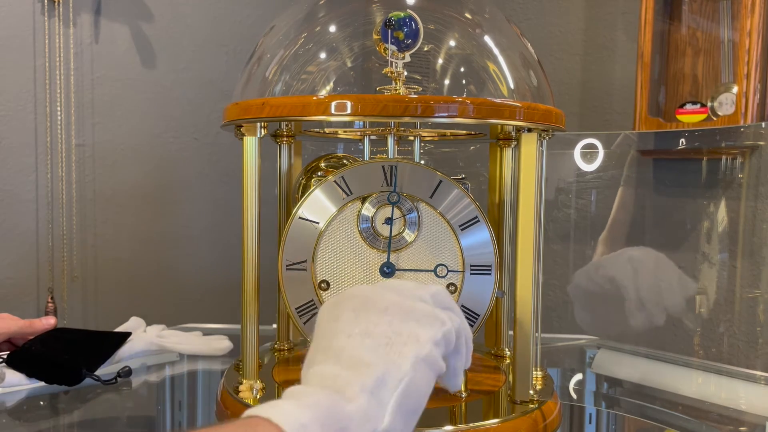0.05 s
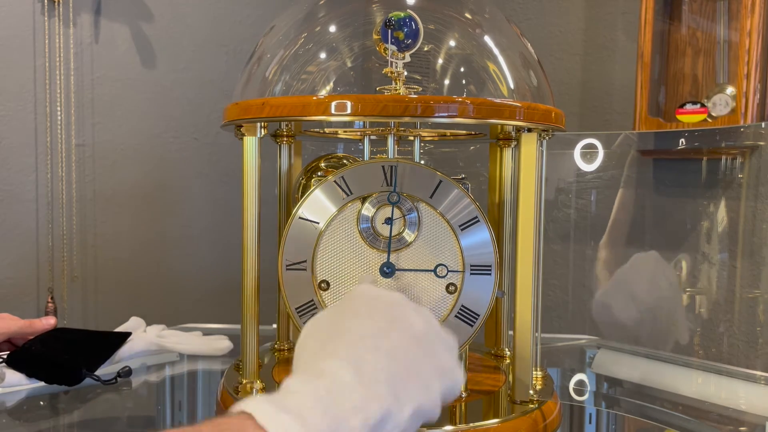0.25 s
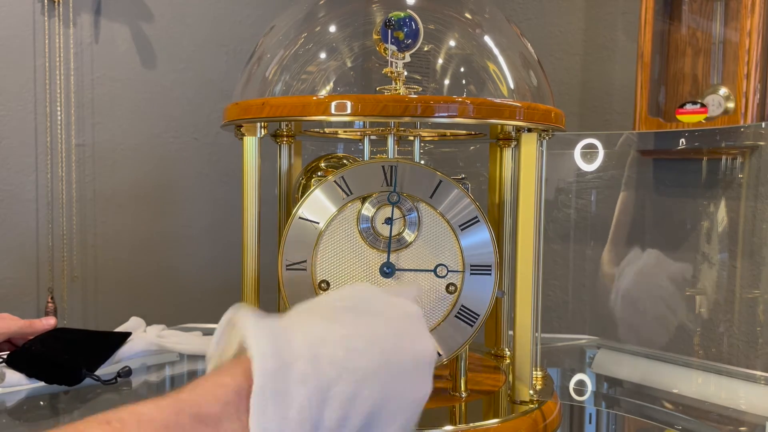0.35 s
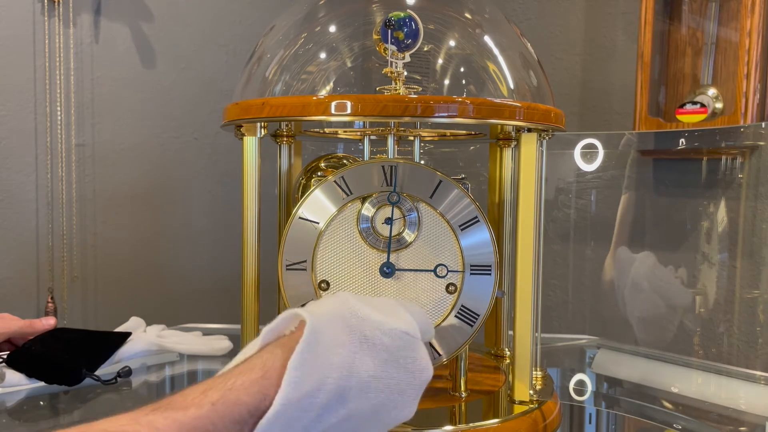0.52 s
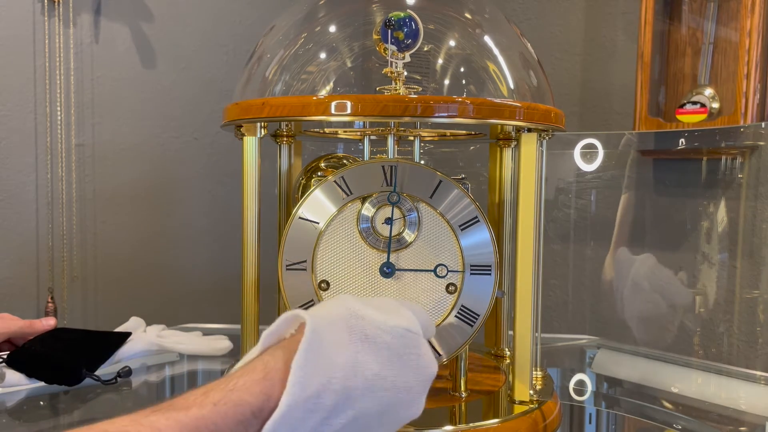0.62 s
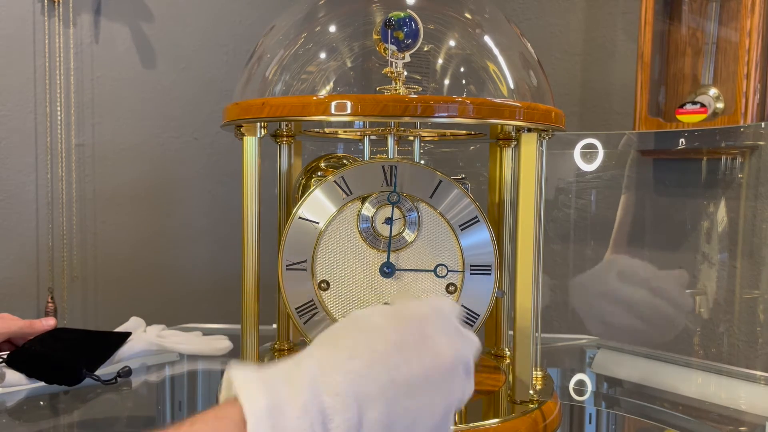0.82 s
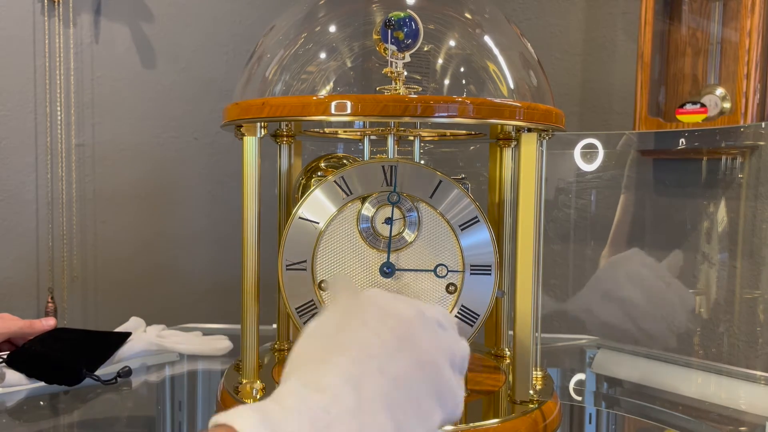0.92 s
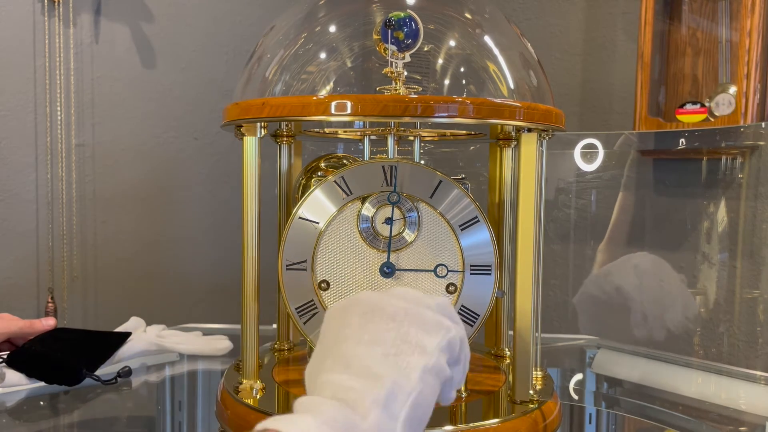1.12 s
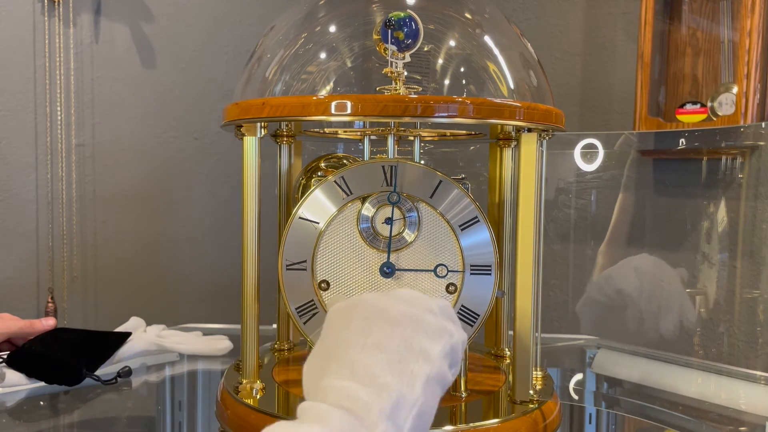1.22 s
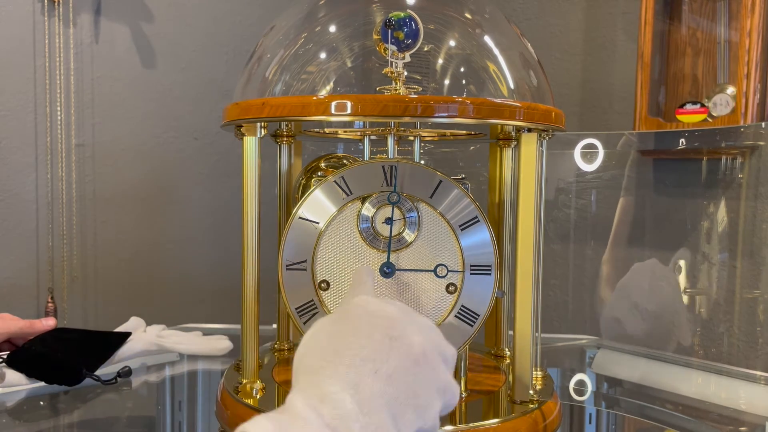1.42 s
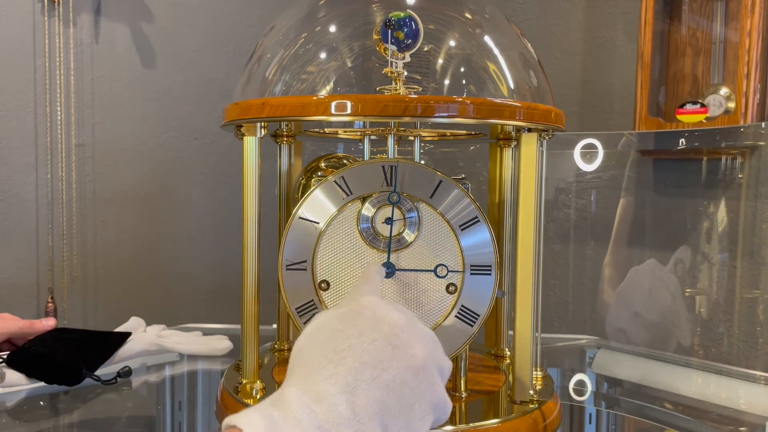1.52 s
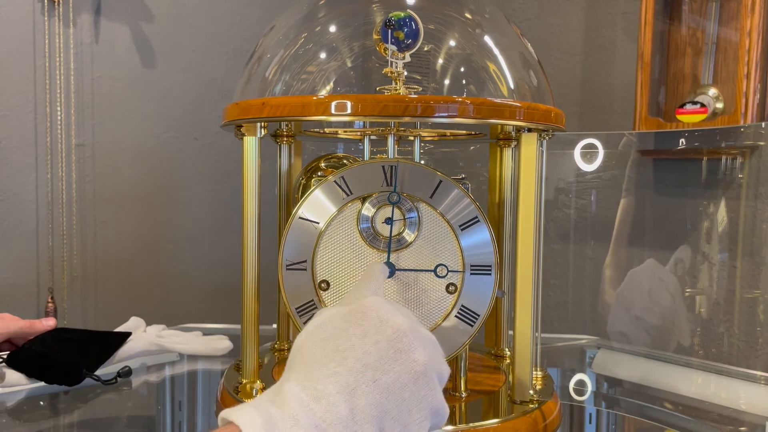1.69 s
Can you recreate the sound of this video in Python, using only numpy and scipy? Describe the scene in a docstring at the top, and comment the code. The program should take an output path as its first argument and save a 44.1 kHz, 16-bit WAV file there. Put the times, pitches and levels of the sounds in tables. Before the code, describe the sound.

Close up, a clock's winding ratchet snaps seven times in quick succession, once more just after, and twice after a pause. The clock ticks faintly and quickly throughout, with soft bumps from a gloved hand and a low room rumble.

```python
"""A quick run of seven ratchet snaps, then three single clicks: a gloved hand winds a brass table clock.
The pawl slips off each tooth and snaps into the next, ringing small parts, plates and case.
Behind it the escapement ticks five times a second and the glove bumps softly on key and case.
Two close microphones also hear reflections off the glass dome, a small room's tail and a low rumble."""
import sys
import numpy as np
from scipy import signal
from scipy.fft import rfft, irfft
from scipy.io import wavfile

SR = 44100
rng = np.random.default_rng(int(sys.argv[2]) if len(sys.argv) > 2 else 0)


def int16_out(signal):
    """Quantize to a 16-bit WAV file."""
    q = np.round(np.clip(np.atleast_2d(signal).T, -1, 1) * 32767)
    wavfile.write(sys.argv[1], SR, q.astype(np.int16))


N = 77175

# pawl snaps: t/s, level/dB, treble/dB, body ring/dB, slip lead/s, slip level/dB, single-tooth weight/0..1
PAWL_SNAPS = [(0.2101, -1.5, 1, 0, 0.0029, -21.5, 0.012), (0.252, 3, -3, -5.5, 0.0024, -23, 0.39),
              (.2840, 0.5, -0.5, -11, .0012, -3.5, 0), (.3213, -2.5, 2.5, -2.5, 0.0012, -6.5, 0),
              (.3578, 2, -2, -2.5, .0010, -10, 0.12), (.3953, -3, 3, 1.5, 0.00049, -5, 0.27),
              (.4322, -3, -0.5, -0.5, 0.002, 1, 0.43), (.5230, -3.5, 1, 2, .0045, -5, 0.8),
              (1.3463, -2.5, 1, 2.5, .0020, -6.5, 1), (1.4886, -3, 1, 2.5, .0046, -2.5, 1)]
# plate and case modes: f/Hz, level/dB, t60/s, change when the key eases over a single tooth/dB
BODY_MODES = [(171, -20.5, 0.18, -9.5), (530, -10, 0.072, -4.5), (619.8, -13.5, 0.18, 1),
              (717.6, -16.5, 0.12, 0), (953.6, -9.5, 0.087, -3.5), (1187, -19.5, 0.029, 0),
              (1257, -8, 0.049, 8.5), (1575, 0.5, 0.057, -15), (2030, -19.5, .05, 13.5),
              (2222, 1, .032, 7.5), (2370, -5.5, 0.033, 2.5), (2940, -5.5, 0.07, 0.5),
              (3258, -14, 0.053, 11.5), (4970, -5.5, 0.048, 1), (12900, -6.5, .07, -9),
              (15490, -8.5, .1, 2)]
# dense ring of small steel and brass parts: f/Hz, level/dB
PARTS_SPECTRUM = [(200, -18), (380, -22), (560, -12), (800, -20), (1000, -12.5), (1250, -3.5), (1750, -14),
                  (2200, 4.5), (2650, -4), (3300, -2.5), (4300, -3), (6000, 0.5), (7000, -1.5),
                  (10500, 5.5), (12500, 5), (14000, 7.5), (15600, 13), (16500, -25)]
# decay of that ring: f/Hz, t60/s
PARTS_DECAY = [(500, 0.19), (2000, 0.049), (5000, 0.038), (10000, 0.037), (16000, 0.016)]


def ratchet(size=8192):
    """Pawl slip and snap both ring the small parts; the snap also rings plates and case."""
    out = np.zeros(N)
    parts_db, modes_db = -15.5, -33
    common_ring, common_power = noise(PARTS_SPECTRUM, size), 0.11
    hz, mode_db, t60_s, single_db = np.array(BODY_MODES).T[:, :, None]
    for at_s, level_db, treble_db, body_db, lead_s, slip_db, single in PAWL_SNAPS:
        for start_s, contact_db in ((at_s - lead_s, slip_db), (at_s, 0)):
            fresh_ring = noise(PARTS_SPECTRUM, size)
            ring = np.sqrt(common_power) * common_ring + np.sqrt(1 - common_power) * fresh_ring
            ring = band_decay(brighten(ring, treble_db), PARTS_DECAY, rise_s=0.0006)
            add(out, start_s, ring * undb(parts_db + level_db + contact_db))
        body = struck_modes(hz, mode_db + single * single_db, t60_s, rise_s=0.0017)
        add(out, at_s, body * undb(modes_db + level_db + body_db))
    return out


# escapement beats: t/s, level/dB, treble/dB
BEATS = [(.116, 0, 2), (.316, 6, -3), (.517, 12, -6), (0.7174, 0, 2.5), (.918, 1, 1.5), (1.114, -3, 3.5),
         (1.316, 3.5, 2), (1.507, -19, 2), (1.701, 10, -3.5)]
# unlock, impulse, drop: t/s from the beat, level/dB
BEAT_CONTACTS = [(-.004, -14.5), (0, -7.5), (.003, -2)]
# contact noise: f/Hz, level/dB
CONTACT_SPECTRUM = [(300, -11.5), (1000, -7), (1600, -5), (2100, 8), (2550, -1), (3000, 1.5), (4200, -13),
                    (5500, 0.5), (7500, 3.5), (10500, 2.5), (13000, 4.5), (15500, 5.5), (16500, 0)]
# pallet and wheel modes: f/Hz, level/dB, t60/s
PALLET_MODES = [(2045, -14, 0.093), (2980, -8.5, 0.034), (3560, -13, .03), (4910, -18, 0.014)]


def escapement(size=4096):
    """Each beat is three small contacts between pallet and wheel, which ring briefly."""
    out = np.zeros(N)
    clicks_db, modes_db, rise_s = -45.5, -52, 0.0005
    shape = envelope(np.arange(size) / SR, rise_s, t60_s=0.032)
    hz, mode_db, t60_s = np.array(PALLET_MODES).T[:, :, None]
    for at_s, level_db, treble_db in BEATS:
        for offset_s, contact_db in BEAT_CONTACTS:
            click = brighten(noise(CONTACT_SPECTRUM, size), treble_db) * shape
            add(out, at_s + offset_s, click * undb(clicks_db + level_db + contact_db))
        add(out, at_s, struck_modes(hz, mode_db, t60_s, rise_s) * undb(modes_db + level_db))
    return out


# glove bumps: t/s, level/dB, centre f/Hz, length/s
GLOVE_BUMPS = [(0.126, -59.5, 464, 0.034), (0.879, -58.5, 274, 0.023), (1.113, -54.5, 257.7, 0.015),
               (1.116, -62.5, 840, 0.023), (1.178, -56.5, 480, .014), (1.178, -58, 180.8, 0.04),
               (1.667, -60, 930, 0.0094)]


def glove():
    """Soft contacts on key and case give dull, narrow-band bumps."""
    out, t = np.zeros(N), np.arange(N) / SR
    for at_s, level_db, hz, length_s in GLOVE_BUMPS:
        spectrum = [(hz / 4, -30), (hz / 1.38, -11), (hz, 0),
                    (hz * 1.4, -15), (hz * 4, -32), (hz * 20, -70)]
        swell = np.exp(-2 * ((t - at_s) / length_s) ** 2)
        out += noise(spectrum, N) * swell * undb(level_db)
    return out


# scatter off the case: f/Hz, gain/dB
CASE_GAIN = [(300, -11), (2000, -11), (5000, -9), (7300, -14), (11000, -12), (15000, -14)]


def case_scatter(x, size=1024, t60_s=0.014):
    """Very short reflections off the case, at one microphone."""
    burst = rng.standard_normal(size) * np.exp(-np.log(1000) * np.arange(size) / SR / t60_s)
    scattered = signal.fftconvolve(x, burst / np.linalg.norm(burst))[:N]
    return equalise(scattered, CASE_GAIN)


# room tail against direct sound: f/Hz, gain/dB
TAIL_GAIN = [(300, -3), (1000, -12.5), (2500, -15.5), (6000, -7.5), (10000, -17.5), (16000, -25)]
# room decay: f/Hz, t60/s
TAIL_DECAY = [(300, 1), (1000, 0.96), (2500, 0.88), (6000, 0.52), (10000, 0.64), (16000, 0.65)]


def dome_and_room(x, size=32768):
    """Early reflections off glass dome and table, then the room's tail."""
    early_db, rise_s = -13, 0.0027
    t = np.arange(size) / SR
    early = rng.standard_normal(size) * envelope(t, rise_s, t60_s=0.13)
    early *= undb(early_db) / np.linalg.norm(early)
    tail = band_decay(shaped_noise(TAIL_GAIN, size), TAIL_DECAY, rise_s)
    tail /= np.linalg.norm(envelope(t, rise_s, t60_s=TAIL_DECAY[2][1]))
    return signal.fftconvolve(x, early + tail)[:N]


# room rumble: f/Hz, level/dB
RUMBLE_SPECTRUM = [(12, -56.5), (20, -10), (59, 4.5), (173, -1.5), (244, -7.5), (282, -10), (666, -29),
                   (734, -23), (1290, -26), (2010, -28), (3440, -42.5), (5090, -44.5), (7000, -57.5),
                   (9100, -72.5), (15400, -120)]
# hiss: f/Hz, level/dB
HISS_SPECTRUM = [(1000, 11.5), (5000, -14), (8000, -18), (16000, -18.5)]


def room_noise():
    """Steady low rumble, nearly alike on both sides, and a faint hiss."""
    rumble_db, hiss_db, pan_db, width = -56.5, -69, 2, 0.24
    sides = np.array([[1], [-1]])
    rumble = noise(RUMBLE_SPECTRUM, N) + width * sides * noise(RUMBLE_SPECTRUM, N)
    hiss = np.array([noise(HISS_SPECTRUM, N), noise(HISS_SPECTRUM, N)])
    return rumble * undb(rumble_db + sides * pan_db / 2) + hiss * undb(hiss_db)


# phase between microphones: f/Hz, left lead/rad
MIC_PHASE = [(100, 0), (2400, .2), (3100, 1.1), (4000, 0), (5250, 0), (6200, -1.4), (6800, -2.7),
             (7700, -3.4), (9200, -4.7), (10900, -6.28), (12800, -7.8), (14500, -9.4), (16500, -10.6)]
# balance between microphones: f/Hz, left minus right/dB
MIC_BALANCE = [(200, 1), (700, 6.5), (2400, 1.5), (4400, 5.5), (8000, -3.5), (15000, 2)]


def microphone_pair(x):
    """The clock reaches the two microphones with different level and phase."""
    hz = np.fft.rfftfreq(2 * N, 1 / SR)
    halves = np.array([[0.5], [-0.5]])
    gain = undb(halves * on_log(MIC_BALANCE, hz))
    phase_rad = halves * on_log(MIC_PHASE, hz)
    return irfft(rfft(x, 2 * N) * gain * np.exp(1j * phase_rad))[:, :N]


def undb(db):
    """Decibels to gain."""
    return 10 ** (np.asarray(db) / 20)


def on_log(points, hz):
    """Interpolate (f/Hz, value) rows over log frequency."""
    knots_hz, values = np.array(points, float).T
    return np.interp(np.log(np.maximum(hz, 1)), np.log(knots_hz), values)


def shaped_noise(spectrum, size):
    """White noise weighted by (f/Hz, gain/dB) rows."""
    gain = undb(on_log(spectrum, np.fft.rfftfreq(size, 1 / SR)))
    return irfft(rfft(rng.standard_normal(size)) * gain, size)


def noise(spectrum, size):
    """Shaped noise at rms 1."""
    x = shaped_noise(spectrum, size)
    return x / np.sqrt(np.mean(x ** 2))


def envelope(t, rise_s, t60_s):
    """Quick rise, exponential fall."""
    return (1 - np.exp(-t / rise_s)) * np.exp(-np.log(1000) * t / t60_s)


def band_decay(x, decay, rise_s):
    """Each band dies at its own rate, set by (f/Hz, t60/s) rows."""
    hz, t = np.fft.rfftfreq(len(x), 1 / SR), np.arange(len(x)) / SR
    centres_hz, t60s = zip(*decay)
    out, spectrum = np.zeros(len(x)), rfft(x)
    for weights, t60_s in zip(np.eye(len(decay)), t60s):
        band_gain = on_log(list(zip(centres_hz, weights)), hz)
        out += irfft(spectrum * band_gain, len(x)) * envelope(t, rise_s, t60_s)
    return out


def struck_modes(hz, level_db, t60_s, rise_s, size=16384):
    """Modes start from rest, neighbours in opposite sign; level and pitch vary a little per blow."""
    t = np.arange(size) / SR
    scatter_db = rng.standard_normal(hz.shape)
    detune = 1 + 0.007 * rng.standard_normal(hz.shape)
    sign = np.cos(np.pi * np.arange(len(hz)))[:, None]
    tones = sign * undb(level_db + scatter_db) * np.sin(2 * np.pi * hz * detune * t)
    return np.sum(tones * envelope(t, rise_s, t60_s), axis=0)


def equalise(x, curve):
    """Filter by (f/Hz, gain/dB) rows."""
    size = 2 * x.shape[-1]
    gain = undb(on_log(curve, np.fft.rfftfreq(size, 1 / SR)))
    return irfft(rfft(x, size) * gain)[..., :size // 2]


def brighten(x, db, shelf_hz=6940):
    """Treble shelf, up or down."""
    return equalise(x, [(shelf_hz / 2, 0), (shelf_hz * np.sqrt(2), db)])


def add(out, at_s, x):
    """Mix x in at a time."""
    i = int(at_s * SR)
    out[i:i + len(x)] += x[:N - i]


# reflections that differ between microphones: f/Hz, gain/dB
DIFFUSE_GAIN = [(1000, -1), (5000, -1), (7000, -12), (11000, -7), (14500, -12)]


def scene():
    """Clock and glove, their reflections and the room noise, in stereo."""
    clock = ratchet() + escapement() + glove()
    diffuse = equalise(np.array([dome_and_room(clock), dome_and_room(clock)]), DIFFUSE_GAIN)
    scatter = np.array([case_scatter(clock), case_scatter(clock)])
    common_reflections = undb(-1) * dome_and_room(clock)
    return microphone_pair(clock + common_reflections) + scatter + diffuse + room_noise()


def record(dry):
    """A steep low-pass cuts the top treble."""
    cutoff_hz = 16600
    return signal.sosfilt(signal.ellip(8, 0.2, 70, cutoff_hz, fs=SR, output="sos"), dry)


dry = scene()
out = record(dry)
int16_out(out)
```